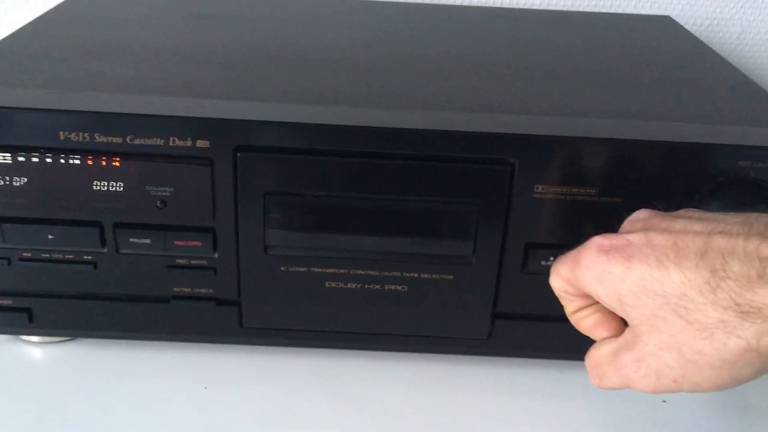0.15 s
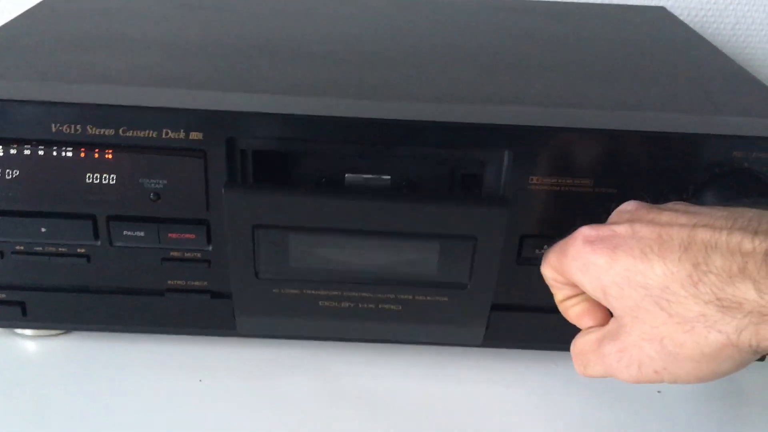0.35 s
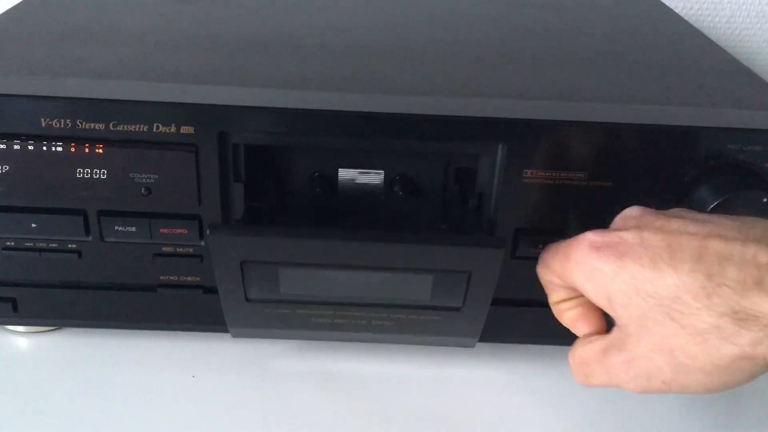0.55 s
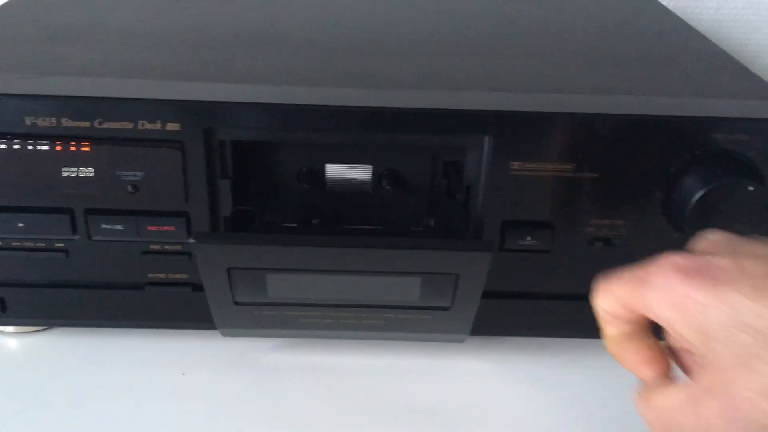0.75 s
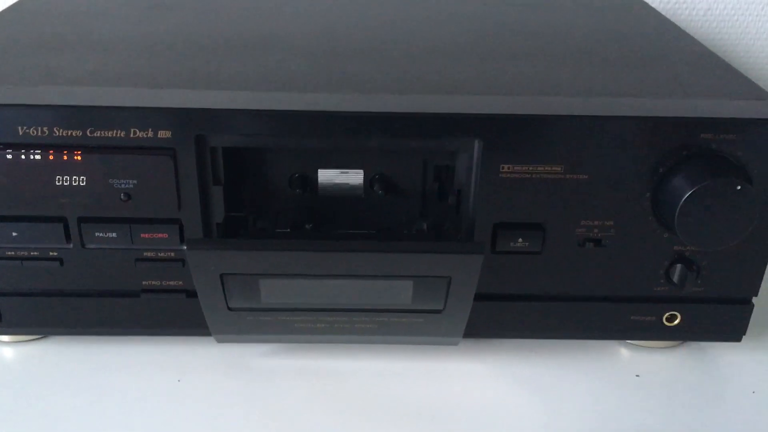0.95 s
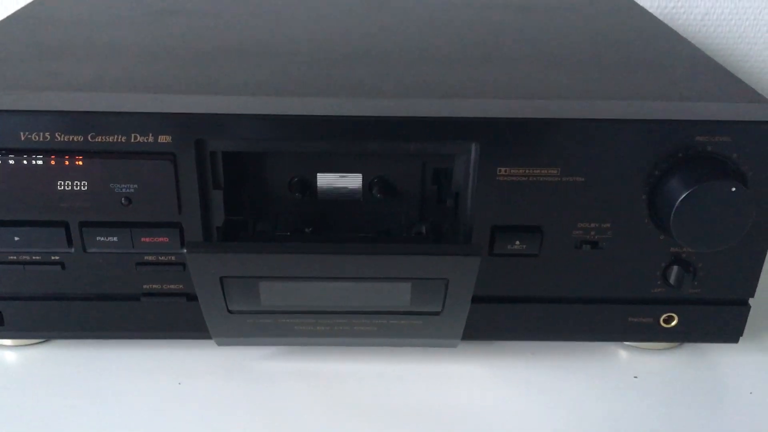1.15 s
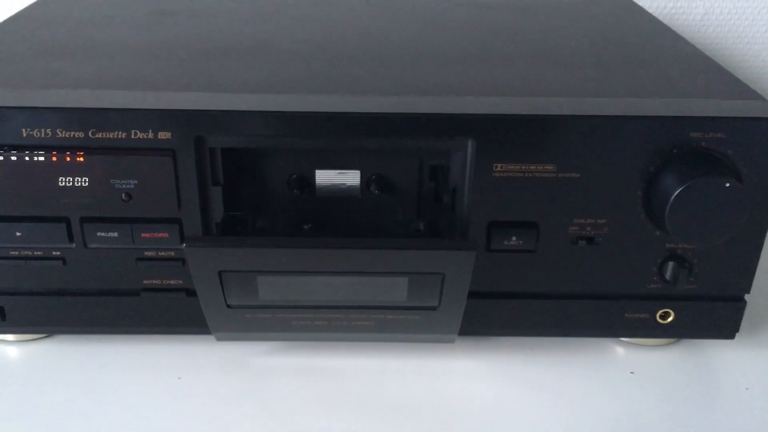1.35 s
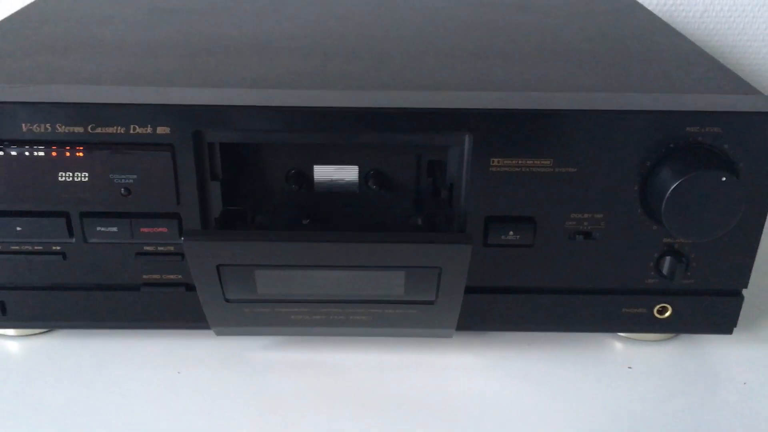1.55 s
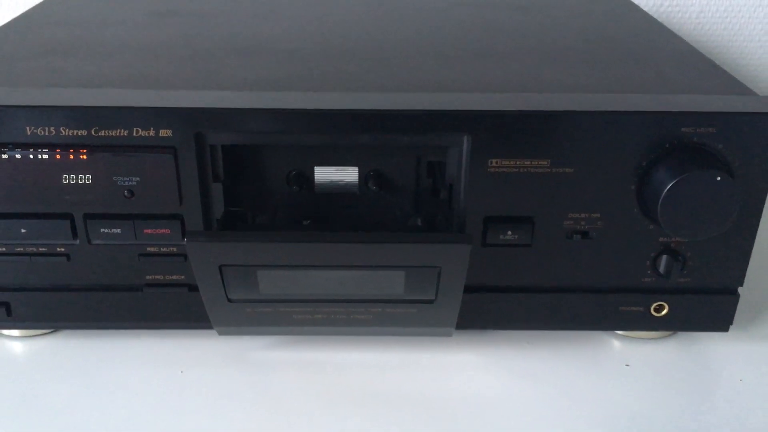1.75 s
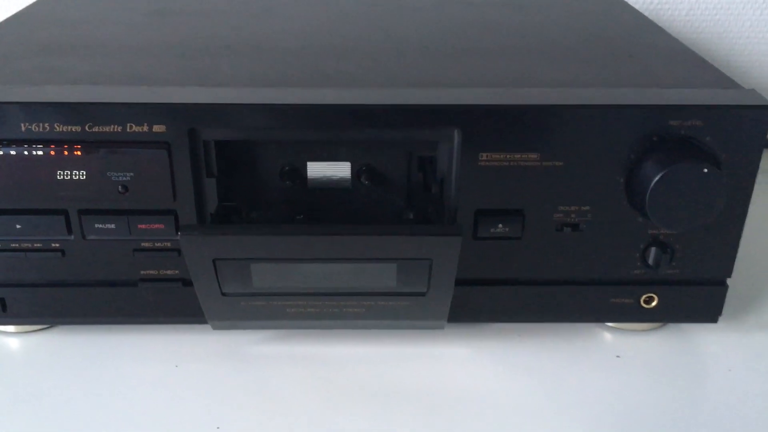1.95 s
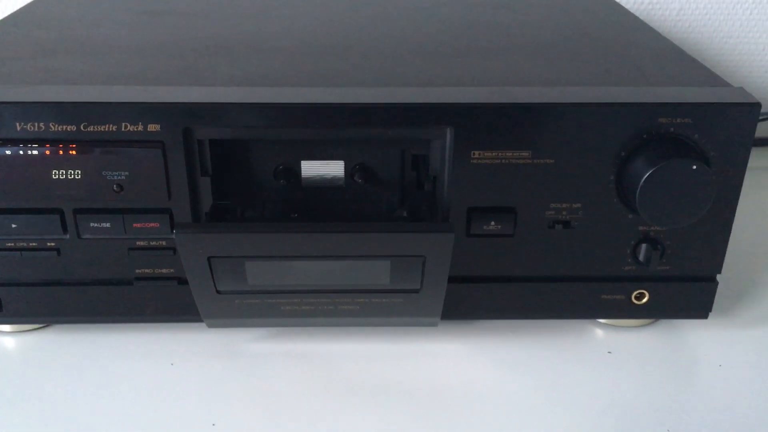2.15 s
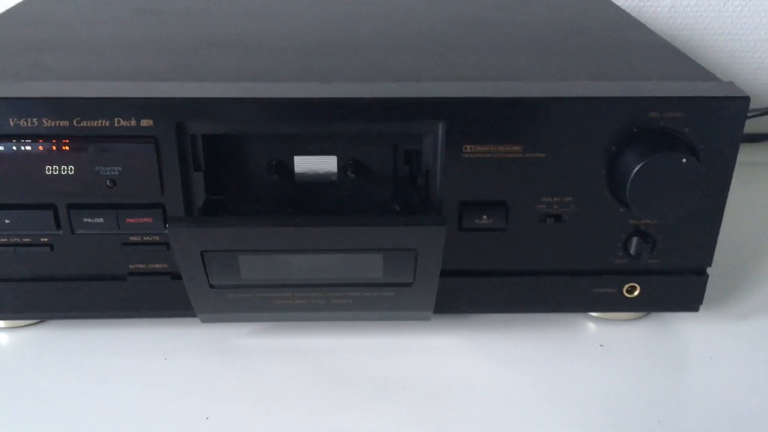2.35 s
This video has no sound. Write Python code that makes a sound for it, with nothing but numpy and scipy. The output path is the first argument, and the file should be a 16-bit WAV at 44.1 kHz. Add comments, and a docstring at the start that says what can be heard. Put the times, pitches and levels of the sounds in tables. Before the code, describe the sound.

Close up in a small, lively room, a cassette player's button booms its metal case, the latch cracks, the door knocks open; after near silence, plastic scrapes softly and a tape shell clicks and creaks.

```python
"""Cassette deck eject and tape handling

The button booms the case (ramped, decaying modes), the latch snaps and a spring rings (decaying sines).
The door drops open and knocks its stop: coloured noise cracks plus hollow modes. Then plastic slides on
plastic (friction noise through passing resonances), and the tape clicks and creaks as it is handled.
Close microphone in a small hard room (noise tails), faint far knocks, room tone, hiss and rumble."""
import sys
import numpy as np
from scipy import signal
from scipy.fft import rfft, irfft
from scipy.io import wavfile
from scipy.ndimage import uniform_filter1d

SR = 44100
rng = np.random.default_rng(int(sys.argv[2]) if len(sys.argv) > 2 else 0)


def materialize(psi):
    """Save the field psi as 16-bit PCM at rate SR to the path in sys.argv[1].

    A 1-D psi becomes a single channel; in a 2-D psi each row is a channel.
    """
    bounded = np.clip(np.atleast_2d(psi).T, -1, 1)
    quanta = np.round(bounded * 32767).astype(np.int16)
    wavfile.write(sys.argv[1], SR, quanta)


N = 110250
T = np.arange(N) / SR  # s
F = np.maximum(np.arange(N + 1) * SR / (2 * N), 1)  # Hz, bins of a double-length FFT


def amp(db):
    """Decibels to gain."""
    return 10 ** (np.asarray(db) / 20)


def unit(x):
    """Scale to rms 1."""
    return x / np.sqrt(np.mean(x ** 2))


def noise():
    """White noise."""
    return rng.standard_normal(N)


def fade(t60_s):
    """Exponential decay by 60 dB in t60_s, at least 2 ms."""
    return np.exp(-np.log(1000) * T / max(t60_s, .002))


def at(start_s, x):
    """Start a sound at start_s; a negative time trims its beginning."""
    k = int(round(start_s * SR))
    padded = np.pad(x, (max(k, 0), max(-k, 0)))
    return padded[max(-k, 0):][:N]


def shape(x, response):
    """Filter by a frequency response."""
    return irfft(rfft(x, 2 * N) * response)[:N]


def colour(points):
    """Minimum-phase response through (f/Hz, level/dB) points, by folding the cepstrum."""
    hz, db = np.array(points, float).T
    cepstrum = irfft(np.log(amp(np.interp(np.log(F), np.log(hz), db))))
    cepstrum[1:N] *= 2
    cepstrum[N + 1:] = 0
    return np.exp(rfft(cepstrum))


def resonance(hz, width_hz):
    """Band-pass response, gain 1 at the centre."""
    return 1 / (1 + 1j * (F ** 2 - hz ** 2) / (F * width_hz))


def ring(modes):
    """Sum of decaying sines, modes as (f/Hz, level/dB, t60/s)."""
    return sum(amp(db) * fade(t60_s) * np.sin(2 * np.pi * hz * T) for hz, db, t60_s in modes)


def flutter(rate_per_s):
    """Smooth random wobble of rms 1: noise averaged twice."""
    k = max(int(SR / rate_per_s), 2)
    return unit(uniform_filter1d(uniform_filter1d(noise(), k), k))


# metal case modes, lowest and upper: f/Hz, level/dB, t60/s
CASE_LOW_MODES = [(54.3, -31.5, 2.4), (124.2, -19.5, 0.46)]
CASE_PANEL_MODES = [(208.4, -6, 0.23), (261.8, 7, 0.078), (287.5, -21.5, 0.073), (365.2, -30.5, 0.36)]
# blows on the case: t/s, level/dB, push length/s, weight of the lowest modes/dB
CASE_BLOWS = [(0.202, -20.5, 0.03, -12), (0.2252, -35, 0.016, 4), (.3130, -23.5, 0.019, 4.5),
              (0.408, -32.5, 0.012, 4), (0.5394, -24.5, 0.013, -10), (0.584, -42, 0.0063, 16.5),
              (0.634, -29.5, 0.037, 4), (.7110, -46.5, 0.02, 21)]
FIRST_BOOM_DB, FIRST_BOOM_RISE_S = -39.5, 0.025


def case():
    """The panels swell during each push and ring down; the hand's touch starts the first boom."""
    panels, low = ring(CASE_PANEL_MODES), ring(CASE_LOW_MODES)
    out = amp(FIRST_BOOM_DB) * panels * np.minimum(T / FIRST_BOOM_RISE_S, 1)
    for start_s, db, push_s, low_db in CASE_BLOWS:
        push = np.minimum(T / max(push_s, .002), 1)
        out = out + at(start_s, amp(db) * push * (panels + amp(low_db) * low))
    return out


# bands of the contact colour: f/Hz
CLICK_BAND_HZ = [500, 850, 2000, 5000, 12000]
# plastic contacts of button, latch, door and tape: t/s, t60/s, then level/(dB per octave) in each band
CONTACTS = [ (0.201, 0.14, -52, -51, -62.5, -75, -69), (0.245, 0.057, -56, -55, -63, -65.5, -61),
            (0.313, 0.077, -45, -44, -43, -40.5, -35.5), (.3150, 0.093, -42.5, -38, -47.5, -39, -45),
            (0.3182, 0.039, -44.5, -56, -39.5, -38.5, -34), (.4130, 0.05, -55, -57, -53, -65, -62),
            (0.5397, 0.088, -49, -44, -49, -60.5, -62), (0.5928, 0.018, -47.5, -43, -45.5, -49.5, -49),
            (0.6004, 0.056, -42.5, -39, -38, -47, -50), (0.71, 0.032, -62, -62, -57, -61, -66),
            (1.637, 0.15, -61, -66.5, -62.5, -63.5, -61.5), (2.0120, .03, -86, -55, -43, -55, -49),
            (2.0763, 0.03, -77.5, -49, -42.5, -39, -35.5), (2.0830, 0.07, -62, -42.5, -47, -50.5, -40.5),
            (2.1180, 0.096, -68, -58, -49, -50, -49), (2.1850, 0.076, -71, -53.5, -44, -61, -52),
            (2.2540, 0.051, -75.5, -59, -50.5, -61.5, -54.5)]
CLICK_BASS_DB = -3  # at 100 Hz, re the lowest band


def clicks(path_count=3):
    """Each contact is a coloured noise crack, plus a pulse of equal energy for one of the room paths."""
    near, paths = 0, np.zeros((path_count, N))
    for k, (start_s, t60_s, *band_db) in enumerate(CONTACTS):
        # level per octave to gain per sample of white noise
        points = [(hz, db + 10 * np.log10(SR / np.sqrt(2) / hz)) for hz, db in zip(CLICK_BAND_HZ, band_db)]
        bass = (100, points[0][1] + CLICK_BASS_DB)
        response = colour([bass] + points)
        envelope = fade(t60_s)
        near = near + at(start_s, shape(noise() * envelope, response))
        pulse = irfft(response)[:N] * np.sqrt(np.sum(envelope ** 2))
        paths[k % path_count] += at(start_s, pulse)
    return near, paths


# first bright strike of the latch: f/Hz, level/dB, t60/s
PING_MODES = [(8520, -18, 0.023), (8970, -21.5, 0.02), (8180, -28.5, 0.045)]
# lasting spring modes: f/Hz, level/dB re SPRING_DB, t60/s
SPRING_MODES = [(8465, 0, .32), (8615, -2, .34), (8660, -5, .4), (8752, -2, .34)]
SPRING_START_S, SPRING_DB, PING_RISE_S = .3176, -45, 0.00027


def spring():
    """The released latch pings and leaves its spring ringing."""
    ping = ring(PING_MODES) * (1 - np.exp(-T / PING_RISE_S))
    return at(SPRING_START_S, ping + amp(SPRING_DB) * ring(SPRING_MODES))


KNOCK_RISE_S = .0012


def strike(modes, blows):
    """Each blow rings the part's modes, most of all those near the pitch of the contact."""
    swell = 1 - np.exp(-T / KNOCK_RISE_S)
    out = 0
    for start_s, blow_db, centre_hz, spread_oct in blows:
        excited = []
        for hz, db, t60_s in modes:
            loss_db = 10 * np.log10(np.e) * (np.log2(hz / centre_hz) / spread_oct) ** 2
            excited.append((hz, blow_db + db - loss_db, t60_s))
        out = out + at(start_s, swell * ring(excited))
    return out


# modes of latch lever, door, tape shell: f/Hz, level/dB, t60/s
LATCH_MODES = [(575, -16.5, .35), (794, -3.5, 0.057), (916, 0.5, 0.056), (2410, -8.5, 0.076),
               (3256, -4.5, 0.054), (3760, -11.5, .1)]
DOOR_MODES = [(700, -14, .2), (835.4, 7, .07), (1160, 1, 0.065), (1454, -0.5, 0.069), (1680, -2, .06),
              (2130, -0.5, 0.092)]
TAPE_MODES = [(723, -15, 0.42), (755, -3, 0.14), (841, 3, 0.063), (964, 4.5, 0.041), (1250, -9, 0.098),
              (1647, -6, 0.047), (1708, -5, 0.066), (2670, -7, 0.12), (3661, -6, 0.16)]
# blows on each part: t/s, level/dB, most excited f/Hz, spread/octaves
LATCH_HITS = [(.2000, -35.5, 830, .4), (0.3137, -29, 1490, 3)]
DOOR_HITS = [(.5392, -40.5, 1240, 0.72), (.6010, -41, 2100, 0.63)]
TAPE_HITS = [(2.0773, -39.5, 900, 1.6), (2.1850, -36, 1700, 0.23), (2.2110, -41, 1590, 0.31)]


def knocks():
    """Hollow modal tones of latch, door and tape shell."""
    return strike(LATCH_MODES, LATCH_HITS) + strike(DOOR_MODES, DOOR_HITS) + strike(TAPE_MODES, TAPE_HITS)


# sliding plastic: t/s, body level/dB, treble level/dB, before the trims
SLIDE_LEVELS = [(1.676, -72, -64), (1.694, -58.5, -54), (1.73, -56, -46.5), (1.83, -51, -39),
                (1.92, -50, -41.5), (1.956, -51, -39.5), (2.001, -60.5, -51.5), (2.025, -55.5, -72),
                (2.06, -84, -87), (2.141, -59, -54), (2.18, -56.5, -61), (2.243, -50, -54.5),
                (2.275, -72.5, -66), (2.305, -71, -78), (2.335, -92, -72.5)]
# friction spectrum: f/Hz, level/dB
FRICTION_COLOUR = [(180, -67), (300, -5), (593, -8.5), (801, 3), (1360, -3.5), (2000, -4), (4910, -6.5),
                   (9550, -4.5), (16000, -8.5)]
# tape shell resonances: f/Hz, width/Hz, level/dB re SHELL_DB, t of peak/s, half-strength time either side/s
SHELL_RESONANCES = [(1693, 54, 8.5, 1.86, 0.2), (1735, 49, 12.5, 1.75, 0.19), (2380, 34, 12, 1.92, 0.06),
                    (2490, 87, 4.5, 1.87, 0.092), (3215, 91, 11, 1.759, .05),
                    (3710, 120, 4.5, 1.835, 0.053), (6800, 110, 7, 2.05, 0.092), (1682, 69, 22, 2.1, .025)]
SHELL_DB, GRAIN_DB, GRAIN_SPREAD_DB, SLIDE_SPLIT_HZ = -0.5, -7, 3, 2640
BODY_TRIM_DB, TREBLE_TRIM_DB = -2.0, -0.5
FLUTTER_PER_S, FLUTTER_DB = 42, 1.43  # uneven grip of the surfaces
CATCH_PER_S, CATCH_DB = 31, 3.5  # each resonance catches and slips on its own


def slide():
    """Fine friction grains excite one resonance of the plastic shell after another."""
    grain_gain = amp(GRAIN_SPREAD_DB * np.minimum(rng.exponential(size=N), 4))
    grains = (rng.random(N) < .04) * noise() * grain_gain  # on 4 % of samples
    grip = amp(FLUTTER_DB * flutter(FLUTTER_PER_S))
    friction = shape((noise() + amp(GRAIN_DB) * unit(grains)) * grip, colour(FRICTION_COLOUR))
    rub = friction
    for hz, width_hz, db, peak_s, length_s in SHELL_RESONANCES:
        passing = 1 / (1 + ((T - peak_s) / length_s) ** 2)
        strength = amp(SHELL_DB + db + CATCH_DB * flutter(CATCH_PER_S)) * passing
        rub = rub + strength * shape(friction, resonance(hz, width_hz))
    body = shape(rub, 1 / (1 + (F / SLIDE_SPLIT_HZ) ** 8))
    treble = rub - body
    t_s, body_db, treble_db = np.array(SLIDE_LEVELS).T
    sliding = (T > t_s[0]) * (T < t_s[-1])
    body_gain = amp(BODY_TRIM_DB + np.interp(T, t_s, body_db)) * sliding
    treble_gain = amp(TREBLE_TRIM_DB + np.interp(T, t_s, treble_db)) * sliding
    return unit(body) * body_gain + unit(treble) * treble_gain


# creak as the shell seats: t/s, f/Hz, level/dB (re rms of the full-length tone)
CREAK_PATH = [(2.218, 741.5, -67.5), (2.229, 814, -58.5), (2.241, 1077, -64), (2.267, 1070, -72)]
CREAK_ROUGH_PER_S = 130


def creak():
    """A brief rising stick-slip tone, roughened by random phase wobble."""
    t_s, hz, db = np.array(CREAK_PATH).T
    phase = 2 * np.pi * np.cumsum(np.interp(T, t_s, hz)) / SR
    tone = np.sin(phase + flutter(CREAK_ROUGH_PER_S))
    return unit(tone) * amp(np.interp(T, t_s, db)) * (T > t_s[0]) * (T < t_s[-1])


# room tail by band: f/Hz, t60/s, level/dB re direct sound
ROOM_BANDS = [(97, 0.77, -2.5), (224, 0.62, 6.5), (577, 0.45, 1), (1530, 0.52, -3.5), (3430, 0.4, -5.5),
              (8900, 0.33, -8.5), (14700, 0.27, -17.5)]
ROOM_BUILD_S = 0.00423


def room(x):
    """Diffuse noise tail in overlapping bands, each with its own decay."""
    log_centres = np.log([row[0] for row in ROOM_BANDS])
    diffuse, tail = noise(), 0
    for (hz, t60_s, db), pick in zip(ROOM_BANDS, np.eye(len(ROOM_BANDS))):
        envelope = fade(t60_s) * (1 - np.exp(-T / ROOM_BUILD_S))
        band = shape(diffuse, np.interp(np.log(F), log_centres, pick))
        tail = tail + amp(db) * band * envelope / np.sqrt(np.sum(envelope ** 2))
    return signal.fftconvolve(x, tail)[:N]


# knocks further off: t/s, level/dB before the envelope
FAR_KNOCKS = [(-.012, -52), (1.293, -48.5), (2.471, -54.5)]
# their spectrum: f/Hz, level/dB
FAR_SPECTRUM = [(100, -13), (230, -3), (500, -3.5), (1200, 3.5), (2000, -0.5), (4200, -11.5), (5200, -20.5),
                (9000, -26.5), (16000, -47)]
FAR_RISE_S, FAR_T60_S = 0.016, 0.55


def far_knocks():
    """Distant knocks arrive as little but reverberation: soft-edged decaying noise."""
    response = colour(FAR_SPECTRUM)
    envelope = (1 - np.exp(-T / FAR_RISE_S)) * fade(FAR_T60_S)
    return sum(at(start_s, amp(db) * unit(shape(noise(), response)) * envelope) for start_s, db in FAR_KNOCKS)


def bed(response, curve):
    """Noise of given response, following a (t/s, level/dB) curve."""
    t_s, db = np.array(curve).T
    return unit(shape(noise(), response)) * amp(np.interp(T, t_s, db))


# room tone spectrum: f/Hz, level/dB
TONE_COLOUR = [(25, -1), (200, -1.5), (370, -10), (620, -17), (1000, -20), (2700, -26.5), (5000, -35),
               (10000, -32), (16000, -29.5)]
# rumble of the hand-held microphone: t/s, level/dB
RUMBLE_CURVE = [(0, -59), (.3, -74), (.7, -51), (0.949, -69), (1.101, -72), (1.28, -52), (1.45, -62.5),
                (2.5, -68)]
# treble hiss: t/s, level/dB
HISS_CURVE = [(0, -87), (.3, -71.5), (0.922, -72), (1.199, -79), (2.5, -82.5)]
# treble hiss spectrum: f/Hz, level/dB
HISS_SPECTRUM = [(100, -11), (4000, -6), (8500, -8.5), (10400, -16), (12500, -3.5), (16000, -17)]
TONE_DB, RUMBLE_HZ, RUMBLE_WIDTH_HZ = -61, 51.9, 22


def floor():
    """Steady room tone, a slowly changing hiss and soft handling rumble."""
    tone = amp(TONE_DB) * unit(shape(noise(), colour(TONE_COLOUR)))
    rumble = bed(resonance(RUMBLE_HZ, RUMBLE_WIDTH_HZ) ** 2, RUMBLE_CURVE)
    return tone + rumble + bed(colour(HISS_SPECTRUM), HISS_CURVE)


KNOCK_ROOM_DB, CASE_ROOM_DB, SPRING_ROOM_DB = -7, -11, -12  # sends to the room


def scene():
    """Deck and tape, direct and through the room, over the background."""
    cracks, paths = clicks()
    rub, hollow, boom, ping = slide() + creak(), knocks(), case(), spring()
    send = rub + amp(KNOCK_ROOM_DB) * hollow + amp(CASE_ROOM_DB) * boom + amp(SPRING_ROOM_DB) * ping
    echo = room(send) + sum(room(pulses) for pulses in paths)
    return (cracks + rub + hollow + boom + ping + echo + far_knocks() + floor())[None]


LOW_CUT_HZ, TOP_HZ = 52.8, 15850


def record(dry):
    """The recorder thins the deepest bass and cuts the top."""
    low_cut = signal.butter(3, LOW_CUT_HZ, "high", fs=SR, output="sos")
    top_cut = signal.ellip(10, .2, 70, TOP_HZ, fs=SR, output="sos")  # ripple/dB, stopband/dB
    return signal.sosfilt(top_cut, signal.sosfilt(low_cut, dry))


dry = scene()
out = record(dry)
materialize(out)
```